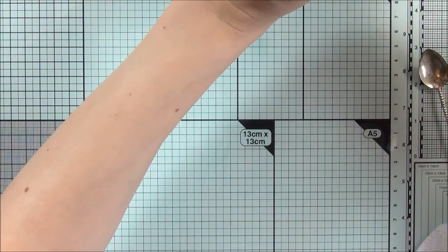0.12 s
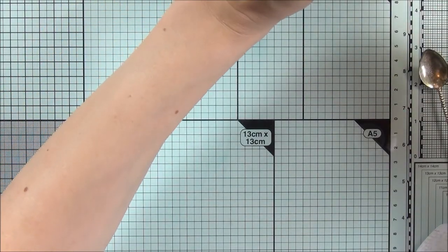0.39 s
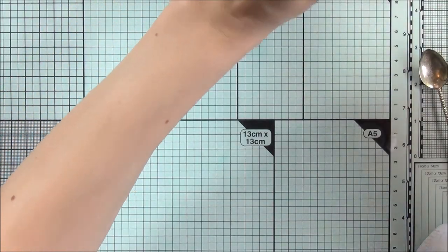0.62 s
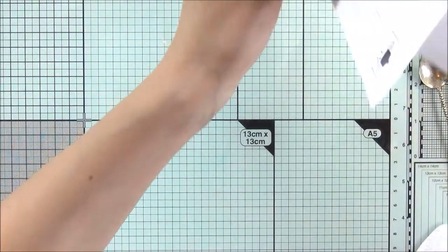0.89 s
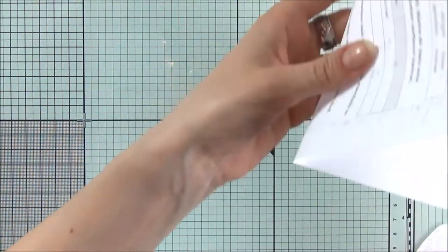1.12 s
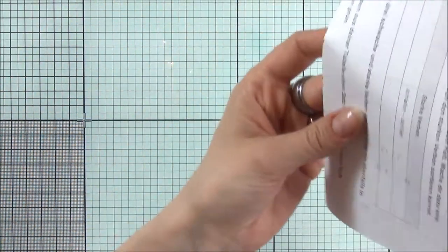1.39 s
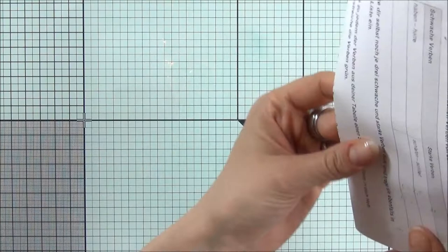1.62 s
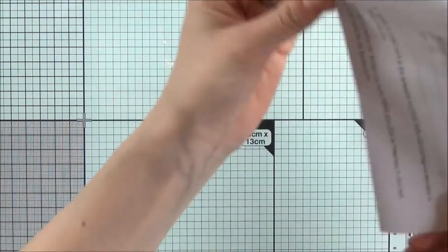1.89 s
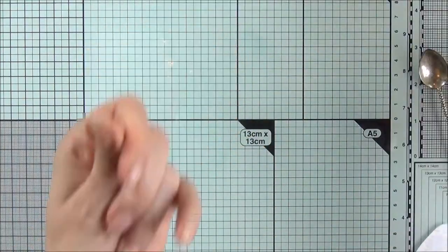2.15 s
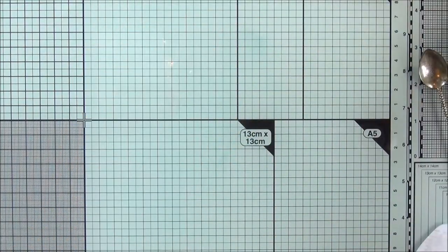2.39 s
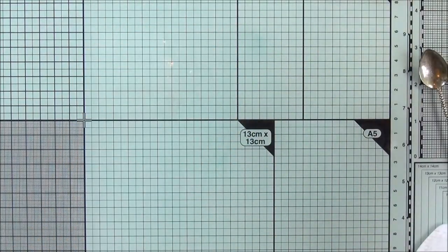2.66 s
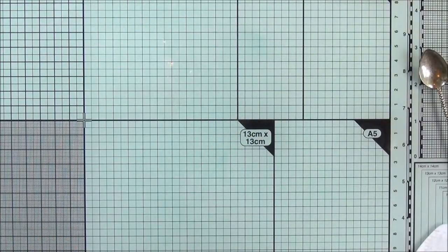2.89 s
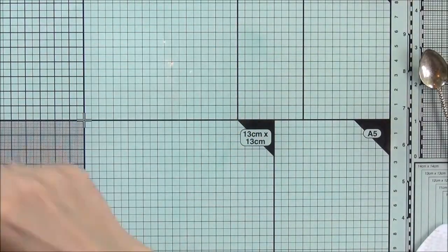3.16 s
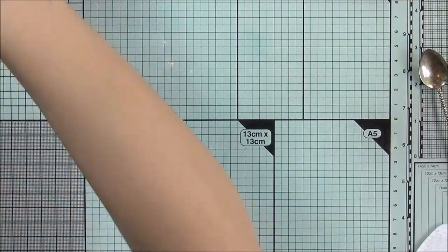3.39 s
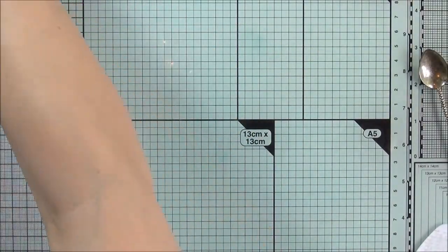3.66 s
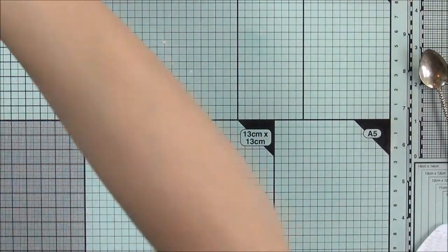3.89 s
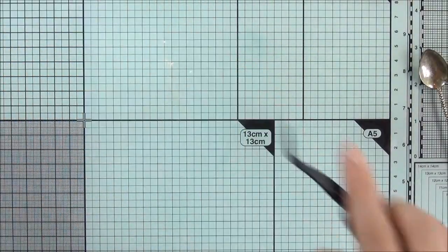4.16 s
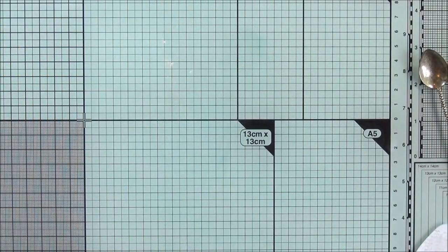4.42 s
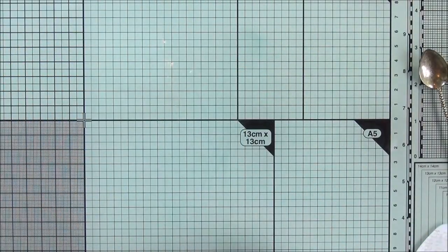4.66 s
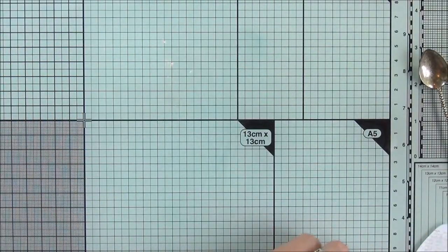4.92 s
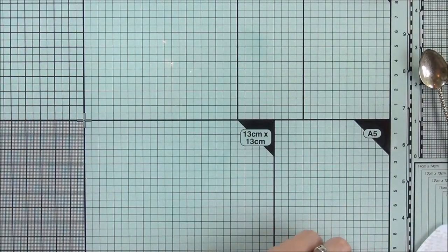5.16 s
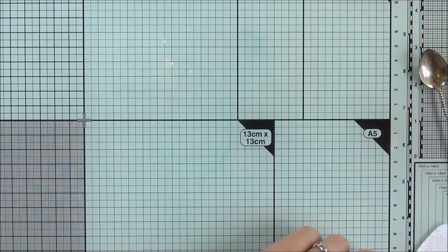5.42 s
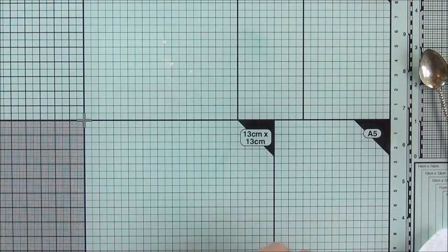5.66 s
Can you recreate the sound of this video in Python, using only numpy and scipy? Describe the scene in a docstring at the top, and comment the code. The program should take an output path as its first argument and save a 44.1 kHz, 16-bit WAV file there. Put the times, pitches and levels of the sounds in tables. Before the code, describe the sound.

A paper sheet is tapped, shaken and slid over a craft table in a quiet room, with sharp snaps, rustles and later faint clicks.

```python
"""Paper handled on a craft table

A sheet of paper is tapped, shaken and slid by hand over a craft table in a small quiet room.
Taps and snaps are noise bursts that ring in resonances of the sheet and the table top; fingers and
powder hiss along the paper as trains of tiny random slips, and a metal part tinkles once as decaying
sines. Steady filtered noise lies below, with a narrow hum near 900 Hz and a broad low murmur near
340 Hz. Two close microphones hear nearly the same.
"""
import sys
import numpy as np
from scipy import signal
from scipy.fft import rfft, irfft, next_fast_len
from scipy.io import wavfile

SR = 44100
rng = np.random.default_rng(int(sys.argv[2]) if len(sys.argv) > 2 else 0)


def gain_from_db(level_db):
    """Turn a decibel level (scalar or array-like) into a linear amplitude factor."""
    decades = np.asarray(level_db, float) / 20
    return 10 ** decades


def bounce(signal):
    """Save signal as a 16-bit WAV file at the path given by the first command-line argument."""
    frames = np.transpose(np.atleast_2d(signal))
    limited = np.clip(frames, -1, 1)
    pcm = np.round(limited * 32767).astype(np.int16)
    wavfile.write(sys.argv[1], SR, pcm)


N = 255484   # length in samples


def rms_one(x):
    """Normalisation: the mean power becomes 1."""
    return x / np.sqrt(np.mean(x ** 2) + 1e-20)


def in_time(rows):
    """Linear interpolation: rows of (seconds, level) become one value a sample."""
    s, level = np.transpose(rows)
    return np.interp(np.arange(N) / SR, s, level)


def at_hz(points, hz):
    """Logarithmic frequency scale: a spectrum is read by straight lines over log Hz."""
    point_hz, value = np.transpose(points)
    return np.interp(np.log(np.maximum(hz, 1)), np.log(point_hz), value)


def coloured(x, spectrum):
    """Linear filtering: each frequency of x is scaled by the spectrum's gain in dB; rms 1."""
    size = next_fast_len(N)
    gain = gain_from_db(at_hz(spectrum, np.fft.rfftfreq(size, 1 / SR)))
    return rms_one(irfft(rfft(x, size) * gain, size)[..., :N])


def drift(rate_hz):
    """Low-passed random process: white noise through two equal poles wanders slowly; rms 1."""
    r = np.exp(-2 * np.pi * rate_hz / SR)
    wander = signal.lfilter([1], [1, -2 * r, r * r], rng.standard_normal(N + SR))
    return rms_one(wander[SR:])   # the first second lets the filter settle


def resonance(x, hz, width_hz):
    """Damped resonance: a pole pair whose radius follows the bandwidth; about unit gain at the top."""
    r = np.exp(-np.pi * width_hz / SR)
    zeros = np.array([1, 0, -1]) * (1 - r * r) / 2
    poles = [1, -2 * r * np.cos(2 * np.pi * hz / SR), r * r]
    return signal.lfilter(zeros, poles, x)


def band(x, low_hz, high_hz):
    """Causal band-pass: a Butterworth filter keeps what lies between two edges."""
    edges_hz = [low_hz, min(high_hz, .45 * SR)]
    return signal.sosfilt(signal.butter(2, edges_hz, "band", fs=SR, output="sos"), x)


def background():
    """Partial coherence: room and microphone noise, less alike on the two sides in the bass, and hums."""
    # Background spectrum. Each row: frequency in Hz, relative level in dB.
    quiet = [(15, -44), (25, -15), (82, -6), (120, -10), (270, -15.5), (335, -8), (427, -21.5), (624, -13),
             (840, -14.5), (911, -1), (1020, -14.5), (1440, -11), (3620, -25), (3920, -22), (16000, -23.5)]
    # Left-right likeness of the background. Each row: frequency in Hz, correlation from 0 to 1.
    likeness = [(30, 0.6), (130, 0.59), (300, 0.63), (1400, 0.96), (3000, 1), (6500, 1), (12000, 0.99)]
    # Hums, one narrow and one broad. Each row: centre in Hz, width in Hz, mean rms level in dB.
    hums = [(896, 6.7, -77), (343, 400, -76.5)]
    quiet_db = -67.5
    size = next_fast_len(N)
    alike = np.clip(at_hz(likeness, np.fft.rfftfreq(size, 1 / SR)), 0, 1)
    mid, side = rfft(rng.standard_normal((2, size)))
    both = np.sqrt(1 + alike) * mid
    opposed = np.sqrt(1 - alike) * side * [[1], [-1]]
    pair = irfft(both + opposed, size)[:, :N]
    out = gain_from_db(quiet_db + 0.2 * drift(12)) * coloured(pair, quiet)
    for hz, width_hz, db in hums:
        hum = rms_one(resonance(rng.standard_normal(N), hz, width_hz))
        out = out + gain_from_db(db + 0.5 * drift(1.8)) * hum   # the level wavers
    return out


def grains(per_s, spread_db, clump_db):
    """Stick-slip friction: tiny random slips of uneven size and either sign, coming in clumps."""
    sizes = gain_from_db(spread_db * np.minimum(rng.exponential(1, N), 5)) * rng.choice([-1, 1], N)
    slips = rng.random(N) < per_s / SR
    return sizes * slips * gain_from_db(clump_db * drift(57))


def sheet(x, through_db):
    """Modal superposition: sheet and table ring at their resonances; some sound passes uncoloured."""
    # Resonances of sheet and table. Each row: frequency in Hz, width in Hz, relative gain in dB.
    modes = [(545, 300, -6.5), (692, 9.9, 3), (791, 18, -10), (1417, 43.5, 12.5), (1619, 99, 1.5),
             (1646, 45, 12.5), (2350, 95, -7.5), (2673, 18, 3.5), (3530, 220, -27)]
    out = gain_from_db(through_db) * x
    for k, (hz, width_hz, db) in enumerate(modes):
        out = out + (-1) ** k * gain_from_db(db) * resonance(x, hz, width_hz)   # neighbours alternate in sign
    return out


def strokes(start, swell, hold, peak_db):
    """Energy envelope: each stroke's power at every 32nd sample, a swell, a sagging hold, a release."""
    swell_db, sag_db_per_s, release_db_per_s = 20.5, 20.5, 611
    t = np.arange(0, N + 32, 32) / SR - start[:, None]
    swell, hold = np.maximum(swell, .001)[:, None], np.maximum(hold, 0)[:, None]
    rising_db = swell_db * np.minimum(t / swell - 1, 0)
    sagging_db = sag_db_per_s * np.clip(t - swell, 0, hold)
    release_db = release_db_per_s * np.maximum(t - swell - hold, 0)
    level_db = peak_db[:, None] + rising_db - sagging_db - release_db
    return gain_from_db(np.maximum(level_db, -140)) ** 2


def every_sample(x):
    """Linear interpolation: fills in a control given at every 32nd sample."""
    return np.interp(np.arange(N) / 32, np.arange(len(x)), x)


def hiss(centre_hz):
    """Band-limited friction noise: the finest slips, their bright band moving with the grip."""
    spread_oct = 1.25   # distance from the centre at which a band's amplitude is 1/e
    slips = rms_one(grains(22000, spread_db=3.5, clump_db=0.4))
    edges_hz = 2000 * 2 ** np.arange(0, 3.1, 1 / 3)   # third-octaves
    power, out = 0, 0
    for low, high in zip(edges_hz, edges_hz[1:]):
        octaves_off = np.log2(np.sqrt(low * high) / centre_hz)
        weight = np.exp(-(octaves_off / spread_oct) ** 2)
        out = weight * band(slips, low, high) - out   # signs alternate so that neighbours join smoothly
        power = power + weight ** 2 * (high - low) / (SR / 2)
    return out / np.sqrt(power)


def rubbing():
    """Sliding friction: the finest slips hiss, coarser ones rustle the sheet, the coarsest shake the table."""
    # Skin and powder slide on paper. Each row: start in seconds, swell in seconds, hold in seconds,
    # hiss level in dB, centre of the hiss in Hz.
    slide_rows = [(0.0, 0.017, 0.023, -65, 6300), (0.11, 0.011, .02, -74, 6200),
                  (0.186, 0.0093, 0.052, -70, 6260), (0.283, .01, 0.064, -67.5, 6000),
                  (0.375, 0.0092, 0.028, -64.5, 6500), (0.475, 0.01, 0.019, -59, 5840),
                  (0.58, 0.23, .03, -57.5, 6400), (0.848, 0.0096, 0.025, -54.5, 6800),
                  (0.889, 0.011, 0.025, -58, 8050), (0.975, .005, .02, -68.5, 8900),
                  (1.039, 0.0063, 0.012, -64.5, 6200), (1.088, 0.12, 0.055, -53.5, 6300),
                  (1.344, 0.0055, 0.031, -64.5, 10000), (1.497, .005, 0.034, -63, 7860),
                  (1.574, 0.0076, 0.016, -65, 6500), (1.637, 0.053, .13, -45.5, 7940),
                  (1.8, 0.057, 0.048, -47.5, 9550), (1.932, .005, 0.0083, -64.5, 8800),
                  (2.11, .03, .03, -68, 10900), (2.203, 0.023, 0.11, -70.5, 10100),
                  (2.433, 0.0043, 0.059, -64, 6360), (2.511, .005, 0.037, -60, 6100),
                  (2.569, 0.0074, 0.0089, -57, 5650), (2.605, 0.038, .11, -65.5, 6100),
                  (2.8, .03, 0.024, -64.5, 9000), (2.865, 0.035, .03, -68, 11100),
                  (2.985, 0.013, 0.019, -64.5, 10900), (3.033, 0.021, 0.046, -65, 13100),
                  (3.12, .01, 0.054, -76.5, 10100), (3.668, .04, 0.11, -70, 6500),
                  (3.96, 0.016, 0.025, -66, 10900), (4.242, 0.032, 0.11, -73.5, 12200),
                  (4.425, 0.033, .06, -77, 9600)]
    # The sheet is bent or dragged. Each row: start in seconds, swell in seconds, hold in seconds,
    # rustle level in dB.
    rustle_rows = [(0.55, 0.048, 0.11, -64.5), (0.664, 0.12, 0.033, -52), (0.846, .005, 0.036, -53),
                   (0.973, 0.0088, 0.028, -66.5), (1.023, 0.023, 0.14, -60.5), (1.168, 0.011, 0.086, -50.5),
                   (1.292, .01, 0.054, -73), (1.405, 0.0082, 0.076, -63.5), (1.496, .005, 0.073, -62),
                   (1.57, 0.0079, 0.073, -59), (1.611, 0.089, 0.11, -45), (1.826, .01, 0.074, -53.5),
                   (2.202, 0.033, .08, -71), (2.44, 0.004, .16, -56.5), (2.599, 0.062, 0.093, -49.5),
                   (2.8, .01, 0.4, -79), (3.642, .07, 0.087, -61.5), (3.803, .01, 0.21, -69.5),
                   (4.105, 0.056, .35, -75)]
    # Thrum of the table under the moving hand. Each row: time in seconds, level in dB.
    thrum_rows = [(0.0, -75), (0.35, -67), (0.55, -93), (0.76, -56.5), (0.93, -65.5), (1.27, -53),
                  (1.45, -70.5), (1.79, -55), (1.93, -79), (2.01, -84), (2.3, -86), (2.64, -65.5),
                  (2.8, -68), (2.97, -74.5), (3.27, -82.5), (3.56, -84), (3.69, -69), (3.84, -62),
                  (3.98, -67), (4.24, -67.5), (4.5, -74.5), (4.76, -80.5), (5.22, -70), (5.79, -80.5)]
    # Filters of rustle and thrum. Each row: frequency in Hz, relative gain in dB.
    rustle_colour = [(500, -21), (1000, -7.5), (1600, -2), (2600, -3.5), (4000, -5), (5500, -14),
                     (9000, -30), (15000, -30)]
    thrum_colour = [(50, -44), (110, -20.5), (230, -6.5), (300, -1), (345, 4.5), (400, -5), (700, -10),
                    (1300, -19.5), (3000, -38)]
    *slide_shape, slide_hz = np.transpose(slide_rows)
    slides = strokes(*slide_shape)
    centre_hz = every_sample(slide_hz @ slides / slides.sum(0))   # the strongest slide sets the colour
    hiss_level = every_sample(np.sqrt(slides.sum(0)))
    rustle_level = every_sample(np.sqrt(strokes(*np.transpose(rustle_rows)).sum(0)))
    thrum_level = gain_from_db(in_time(thrum_rows))
    rustle_slips = grains(4000, spread_db=2.5, clump_db=2.0)
    rustle = coloured(sheet(rustle_slips, through_db=6.5), rustle_colour)
    thrum = coloured(grains(1500, spread_db=2.5, clump_db=2.5), thrum_colour)
    return hiss_level * hiss(centre_hz) + thrum_level * thrum + rustle_level * rustle


def taps():
    """Impact excitation: each contact is a sudden burst of slips; the lower a part, the longer it lingers."""
    # Taps and snaps, levels ahead of ringing and mixing. Each row: start in seconds, peak of the snap
    # in dB, then thud, knock and crack in dB relative to the snap.
    tap_rows = [(0.0, -45.5, -6.5, -4.5, -9), (0.1004, -27, -19, -21, -8), (0.196, -39.5, -5.5, -6.5, -20),
                (0.2866, -35.5, -10, -5, -33), (0.3945, -42, -7, -4, -12), (0.4003, -33.5, -9, -12.5, -12),
                (0.476, -46, 0.5, -2.5, -13), (0.531, -63.5, 5, 1, -10), (0.545, -34.5, -20, -23.5, -22),
                (0.949, -58.5, 4, 10.5, -3), (0.9781, -44, -17, -27, -15), (0.991, -48, -2, -4, -15),
                (1.058, -56, 4, 4, -5), (1.18, -26.5, -16, -6.5, -22), (1.214, -29.5, -22, -5.5, -15),
                (1.2307, -29, -21, -6, -20), (1.2618, -41.5, -13, 8, -12), (1.2865, -28.5, -17, -6, -33),
                (1.2905, -19, -30, -15, -26), (1.376, -47, -10, -1, -15), (1.414, -44.5, -9, -1, -31),
                (1.428, -46.5, -7, 1.5, -27), (1.506, -46, -29, -27, 0), (1.5873, -30.5, -19.5, -11.5, -20),
                (1.6099, -32.5, -15.5, -7.5, 2), (1.7316, -37.5, -14.5, -2, -1),
                (1.8228, -18, -24.5, -23, -18), (1.8425, -34.5, -12.5, -4.5, -13),
                (1.8614, -32, -19, -9, -10), (1.9396, -53, -12, -22, 15), (1.985, -53.5, -13, -14, 4),
                (2.213, -67.5, 7, 17, -7), (2.232, -65.5, 10, 15.5, -7), (2.3094, -63, -8, 8, -6),
                (2.411, -60, -8, 3.5, -1), (2.4383, -44, -41, -3.5, 3), (2.5176, -34, -24, -1.5, -19),
                (2.5798, -36, -39, -35, -10), (2.7698, -45, -29, -11, -20), (2.8463, -57.5, -9, -23, 18),
                (3.069, -61, -18, -17, 18), (3.356, -52.5, -36, -25, 19), (3.664, -64, 9, 6, -5),
                (3.681, -56, 5, 6, 1), (3.723, -40.5, 2, 0.5, -12), (3.743, -51.5, 10, -13, -14),
                (3.7854, -45.5, -22, -31, 12.5), (3.813, -59, -20, -20, 10), (3.893, -62.5, -20, -23, 21.5),
                (4.153, -54, -14, -24, -7), (4.8912, -54, -8, -8, 16), (5.1891, -28, -30.5, -23.5, 5),
                (5.2027, -36, -50, -20.5, 5), (5.3702, -59, -13, 1, 16), (5.413, -68, -10, -8, 19),
                (5.6024, -25.5, -33.5, -16, 5)]
    # Parts of a tap: thud, knock, snap, crack. Each row: low edge in Hz, high edge in Hz,
    # decay time relative to the contact.
    part_rows = [(129.4, 530, 2.8), (372, 1290, 2.02), (1100, 3890, 1.15), (3960, 9300, 0.8)]
    contact_ms = 4.26         # for a crack as strong as the snap
    shorter_per_db = 0.0662   # the brighter the crack, the shorter the contact: dB of length per dB
    t = np.arange(SR // 8) / SR
    s, snap_db, thud_db, knock_db, crack_db = np.transpose(tap_rows)
    starts = np.round(s * SR).astype(int)
    contact_s = contact_ms / 1000 * gain_from_db(-shorter_per_db * crack_db)[:, None]
    noise = rng.standard_normal((len(tap_rows), 4, len(t)))
    parts = np.zeros((4, N + len(t)))
    for k, (low_hz, high_hz, linger) in enumerate(part_rows):
        lasts = linger * contact_s
        onset = 1 - np.exp(-t / (0.015 * lasts))
        dying = np.exp(-t / lasts) + 0.12 * np.exp(-t / (6.8 * lasts))   # the sheet flutters on
        bursts = band(onset * dying * noise[:, k], low_hz, high_hz)
        peaks = gain_from_db(snap_db + [thud_db, knock_db, 0, crack_db][k]) / np.abs(bursts).max(axis=1)
        for start, peak, burst in zip(starts, peaks, bursts):
            parts[k, start:start + len(t)] += peak * burst
    thud, knock, snap, crack = parts[:, :N]
    ringing_knock = gain_from_db(5) * sheet(band(knock, 360, 1010), through_db=-3)
    ringing_snap = gain_from_db(-2.0) * sheet(snap, through_db=0)
    return gain_from_db(4) * band(thud, 70.5, 525) + ringing_knock + ringing_snap + gain_from_db(-12.0) * crack


def tinkle():
    """Free vibration: one touch sets the modes of a small metal part ringing, each dying exponentially."""
    # Modes of the metal. Each row: frequency in Hz, relative level in dB, 60 dB decay time in seconds.
    metal = [(5920, 2, .08), (9600, 3, .08), (10350, -6, .04)]
    start_s, level_db = 4.891, -65
    t = np.maximum(np.arange(N) / SR - start_s, 0)
    return sum(gain_from_db(level_db + db - 60 * t / t60) * np.sin(2 * np.pi * hz * t) for hz, db, t60 in metal)


def room(x):
    """Diffuse reverberation: dense echoes from 3 ms on, the treble dying twice as fast; two unrelated sets."""
    t60_s, wall_cut_hz = 0.16, 5700
    t = np.arange(SR // 2) / SR
    noise = rng.standard_normal((2, len(t))) * (t > .003)
    dull = signal.sosfilt(signal.butter(1, wall_cut_hz, fs=SR, output="sos"), noise)
    echoes = dull * gain_from_db(-60 * t / t60_s) + (noise - dull) * gain_from_db(-120 * t / t60_s)
    echoes = echoes / np.sqrt(np.sum(echoes ** 2, axis=1, keepdims=True))   # energy 1
    return signal.fftconvolve(x[None], echoes)[:, :N]


def scene():
    """Direct and reverberant fields: the table in its room; the close pair hears the echoes almost alike."""
    room_db, apart_db = -10.5, -20.0
    table = rubbing() + taps() + tinkle()
    shared, apart = room(table)
    echoes = gain_from_db(room_db) * shared + gain_from_db(apart_db) * apart * [[1], [-1]]
    return table + echoes + background()


def band_limit(x):
    """A steep low-pass at the top of the band."""
    return signal.sosfilt(signal.butter(12, 16490, fs=SR, output="sos"), x)


def record(dry):
    """Interchannel differences: the left takes more bass, the sides part around 6 kHz, the top is cut."""
    mid = dry.mean(0)
    bass = signal.sosfiltfilt(signal.butter(1, 280, fs=SR, output="sos"), mid)
    treble = np.roll(band(mid, 4800, 10000), 3)   # three samples late
    lean = gain_from_db(-12) * bass + gain_from_db(-17) * treble
    top_cut = signal.ellip(10, .3, 50, 15780, fs=SR, output="sos")
    mix = signal.sosfilt(top_cut, dry + lean * [[1], [-1]])
    return band_limit(mix)


dry = scene()
out = record(dry)
bounce(out)
```